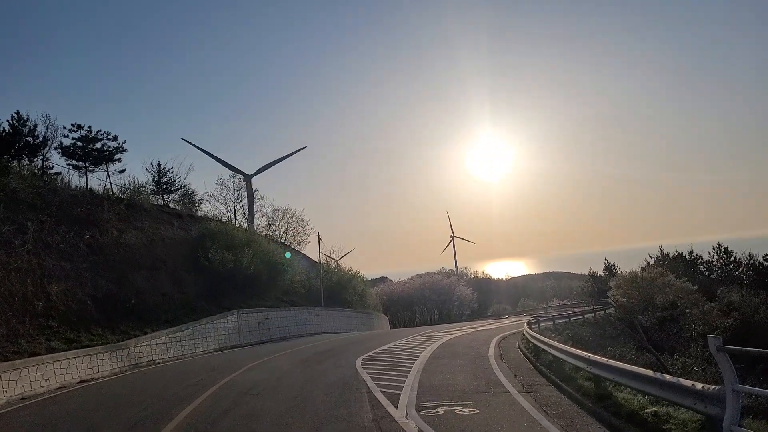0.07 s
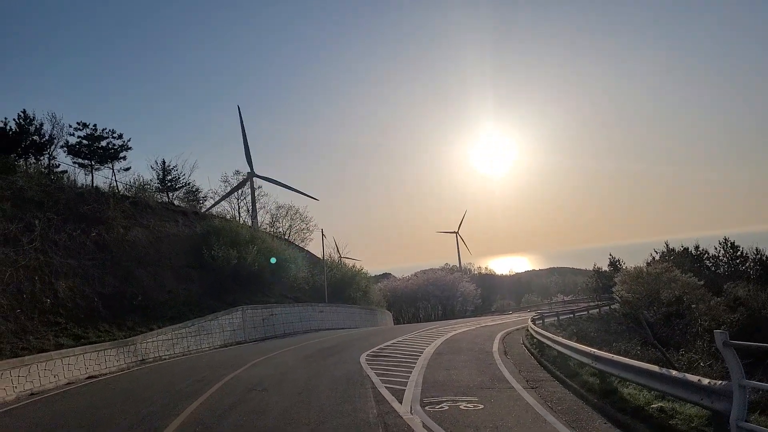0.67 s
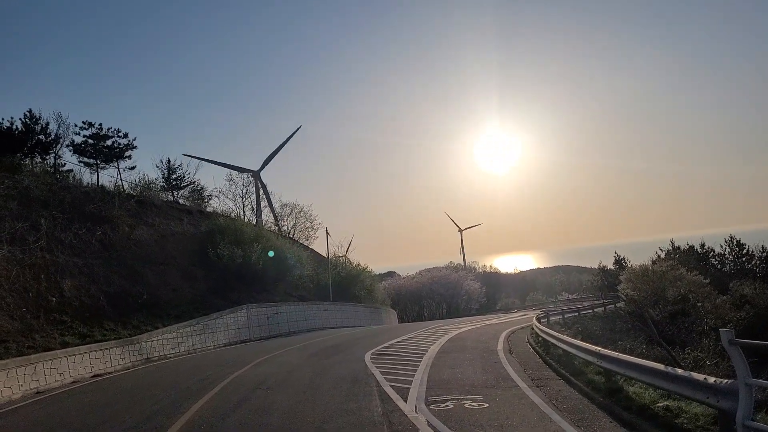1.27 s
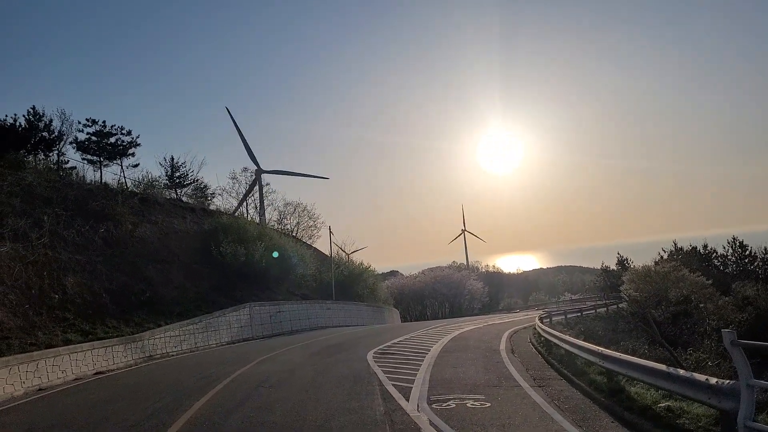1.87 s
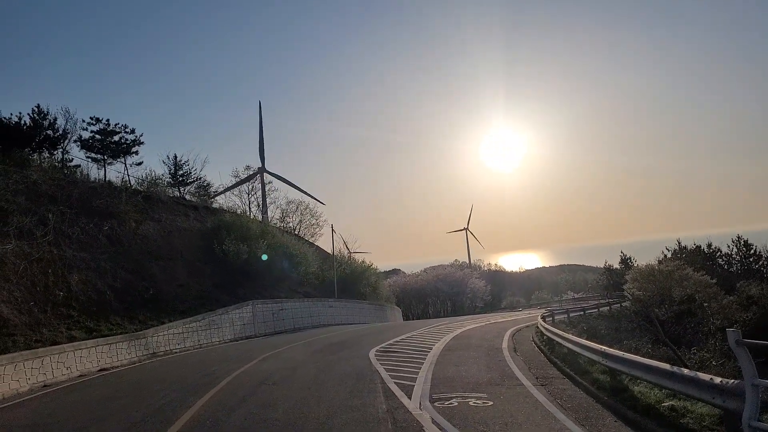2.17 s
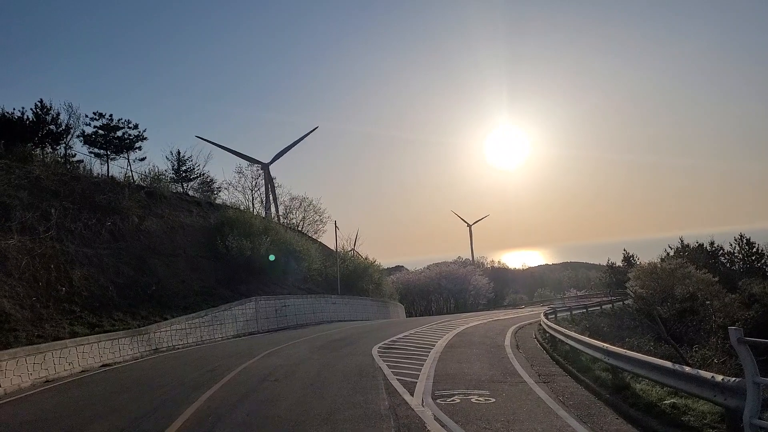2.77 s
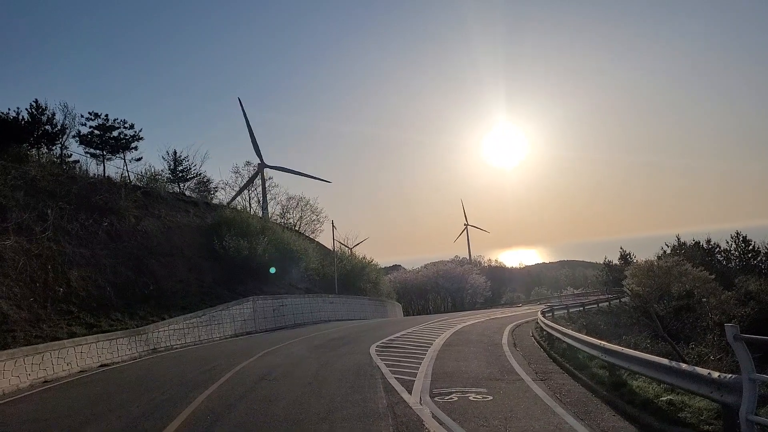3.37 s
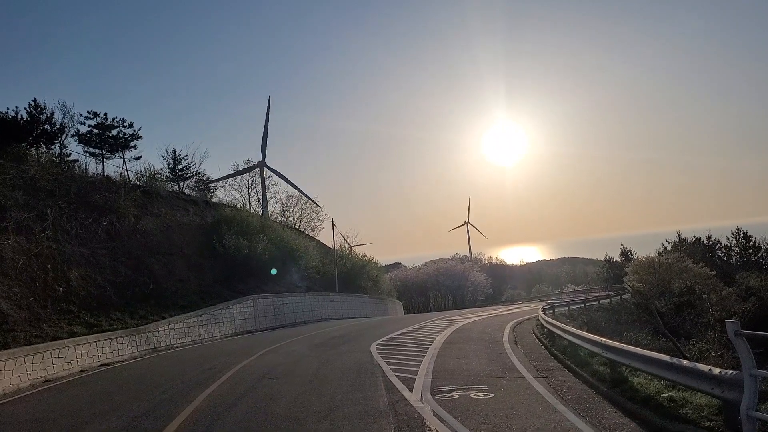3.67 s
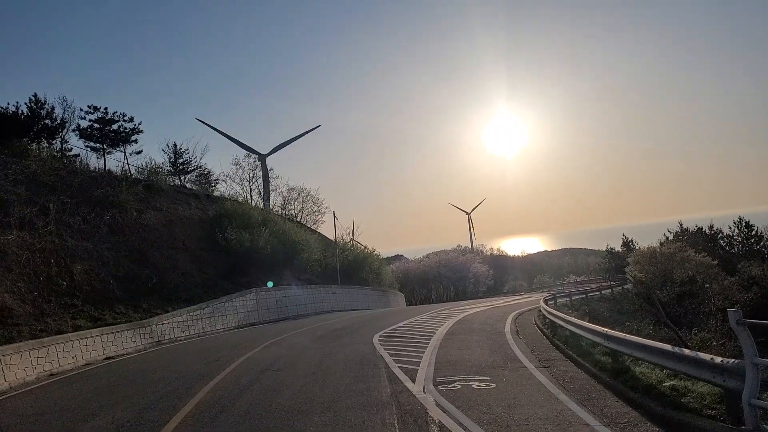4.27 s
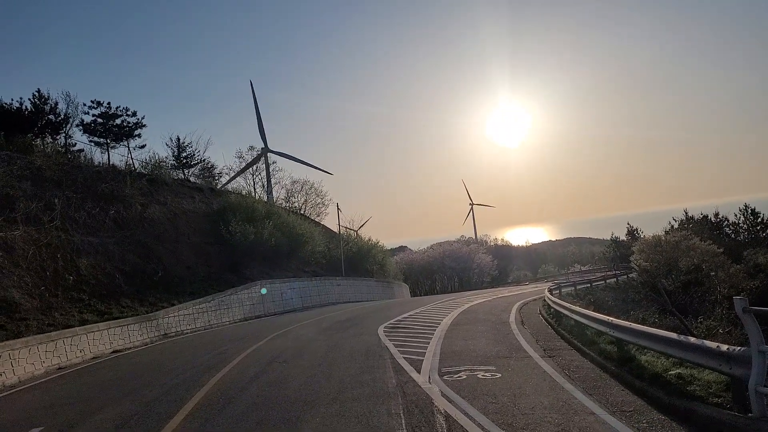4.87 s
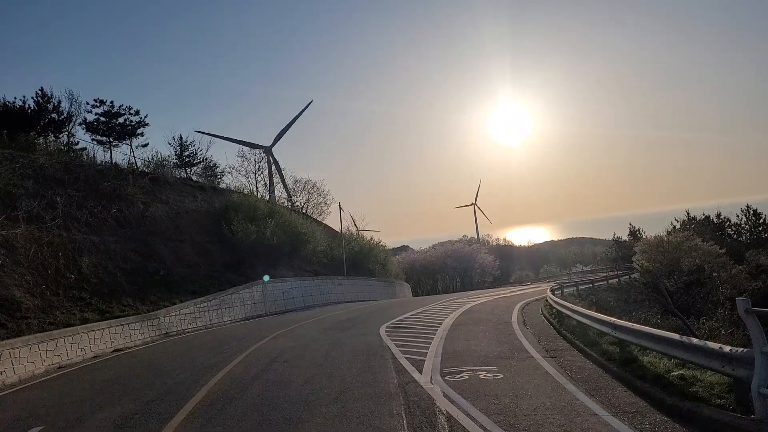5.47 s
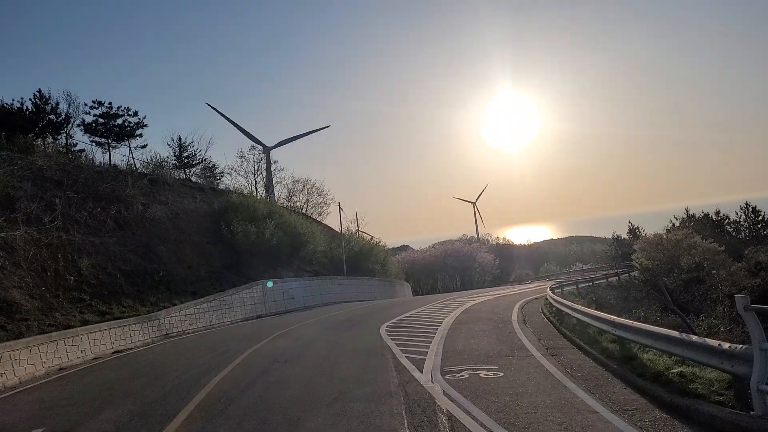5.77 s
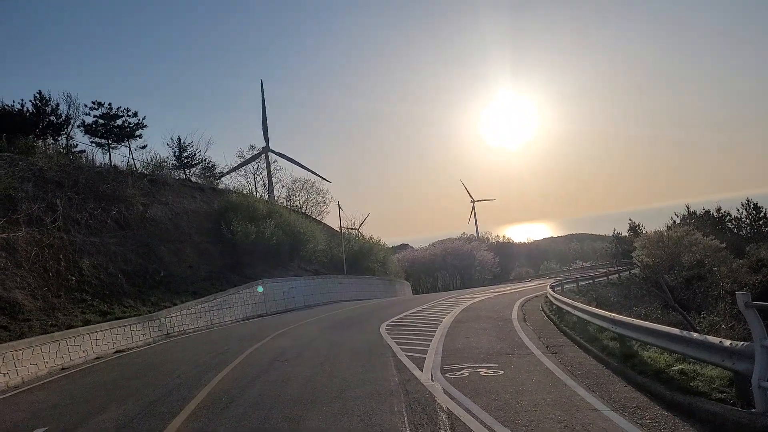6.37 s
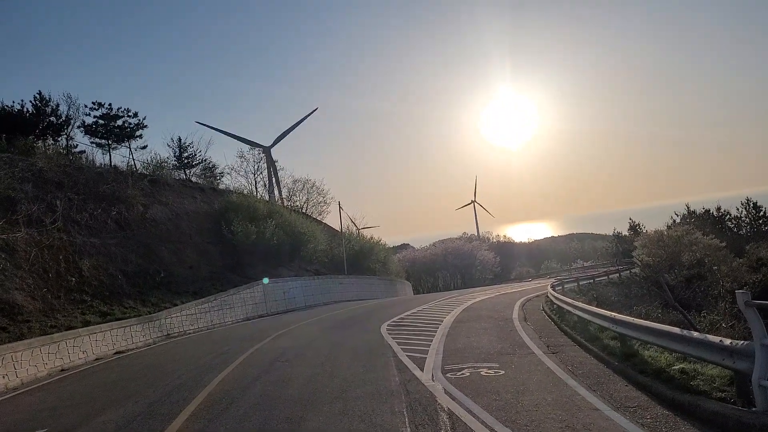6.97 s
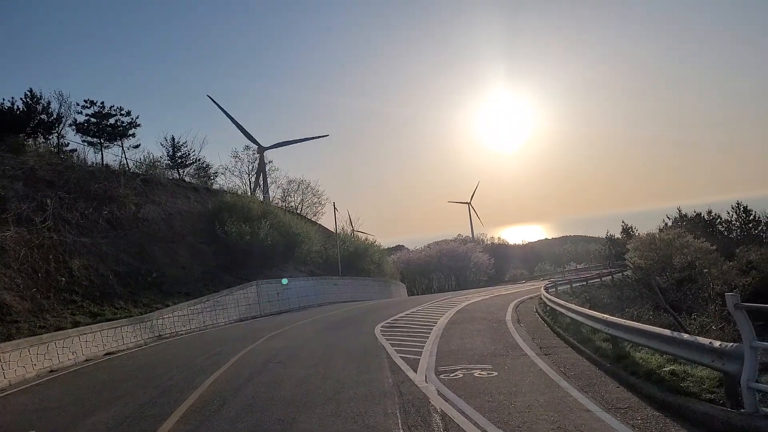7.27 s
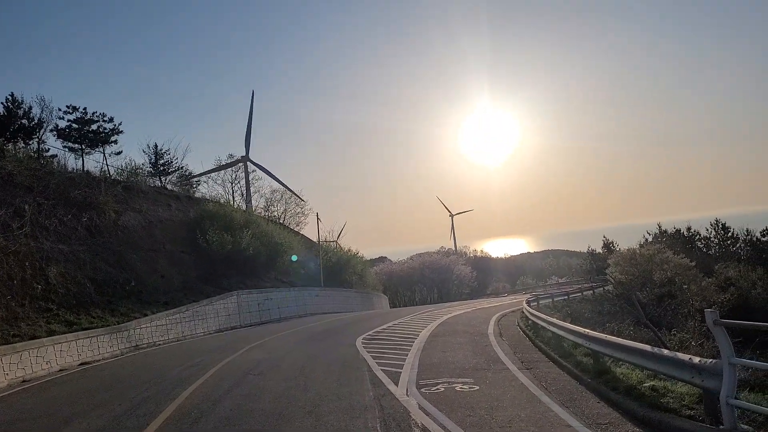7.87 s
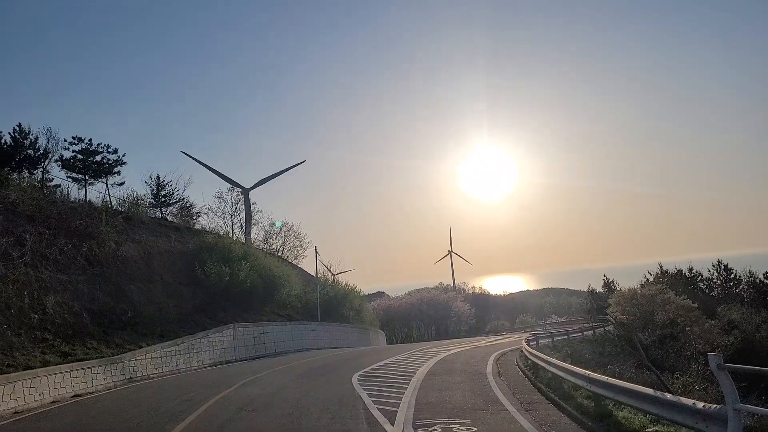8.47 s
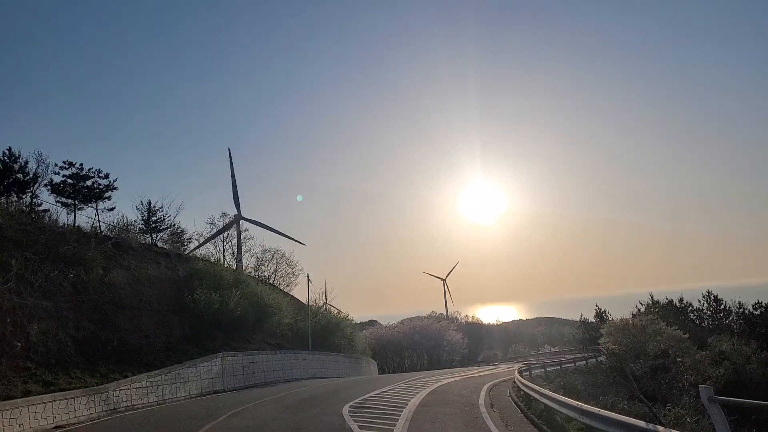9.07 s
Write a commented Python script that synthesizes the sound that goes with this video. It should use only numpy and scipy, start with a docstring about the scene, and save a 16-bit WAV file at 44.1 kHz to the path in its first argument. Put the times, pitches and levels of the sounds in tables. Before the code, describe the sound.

On an open roadside by the coast, low wind rumble flutters on the microphone over the roar and slow swish of wind turbines. Faint bird notes sound in the first couple of seconds, followed by one short, light rub against the microphone. The blade tips whistle softly now and then. About seven seconds in, a strong gust thumps the right channel for over a second before the breeze settles.

```python
"""Wind turbines roar and swish over a low wind rumble, on a coastal roadside in a light breeze.
The roar swells with the breeze and each falling blade; one rough blade hisses once a turn,
and tip vortices whistle now and then. Eddies rumble on both microphone ports of a hand-held
camera, and one gust hits the right port hard. Fainter: a far bird's warble, one brush against
the camera, a thin sizzle on the right and microphone hiss."""
import sys
import numpy as np
from scipy import signal
from scipy.fft import rfft, irfft
from scipy.io import wavfile
from scipy.ndimage import uniform_filter1d

SR = 44100
rng = np.random.default_rng(int(sys.argv[2]) if len(sys.argv) > 2 else 0)


def digitize_waveform(pressure):
    """Quantize a signal to 16-bit integers and store it at the path in sys.argv[1].

    Rows of a 2-D input are taken as channels; values are limited to [-1, 1].
    """
    field = np.atleast_2d(pressure).T
    bounded = np.clip(field, -1, 1)
    quanta = np.round(bounded * 32767).astype(np.int16)
    wavfile.write(sys.argv[1], SR, quanta)


N = 406602
TIME_S = np.arange(N) / SR
TURN_S, BLADE_COUNT = 4.18, 3

# breeze strength, driving roar and eddies: t/s, relative level/dB
BREEZE = [(0.0, 0.4), (0.21, 0.1), (0.59, -1.3), (0.82, -0.5), (1.62, 0.5), (1.79, 2.5), (2.61, 0.6),
          (2.98, 1.05), (3.5, 2.5), (3.87, -1.5), (4.28, -1.06), (5.28, -1.4), (6.33, 0.26), (6.86, -1.5),
          (6.91, 3.3), (7.76, 5), (8.51, -3.5), (9.22, -1.5)]


def gain_of(db):
    """dB to amplitude factor."""
    return 10 ** (np.asarray(db) / 20)


def unit_rms(x):
    """Scale to rms 1."""
    return x / np.sqrt(np.mean(x ** 2) + 1e-20)


def over_hz(rows, hz, column=1):
    """Interpolate a table column over log frequency."""
    table = np.transpose(rows)
    return np.interp(np.log(hz + 1), np.log(table[0] + 1), table[column])


def over_time(rows, t, column=1):
    """Interpolate a table column over time."""
    table = np.transpose(rows)
    return np.interp(t, table[0], table[column])


def noise(spectrum):
    """Steady coloured noise, rms 1."""
    shape = gain_of(over_hz(spectrum, np.fft.rfftfreq(N, 1 / SR)))
    return unit_rms(irfft(rfft(rng.standard_normal(N)) * shape, N))


def wander(t, rate_hz):
    """Smooth random drift around rate_hz, rms 1."""
    size, control_hz = 4096, 400
    ratio = np.fft.rfftfreq(size, 1 / control_hz) / rate_hz
    path = unit_rms(irfft(rfft(rng.standard_normal(size)) * ratio / (1 + ratio ** 4)))
    return np.interp(t, np.arange(size) / control_hz, path)


def stft_grid(size=1024):
    """Frame times/s (a column) and bin frequencies/Hz."""
    hop = size // 4
    return np.arange(N // hop + 5)[:, None] * hop / SR, np.fft.rfftfreq(size, 1 / SR)


def noise_frames(t, hz):
    """Short-time spectra of white noise."""
    return rng.standard_normal((len(t), len(hz))) + 1j * rng.standard_normal((len(t), len(hz)))


def to_sound(frames, size=1024):
    """Short-time spectra (frames x bins) to samples."""
    return signal.istft(np.swapaxes(frames, -1, -2), nperseg=size, noverlap=size * 3 // 4)[1][..., :N]


def patches(t, hz, frames, bins):
    """Random lumps in time and frequency, rms 1."""
    white = rng.standard_normal((len(t), len(hz)))
    return unit_rms(uniform_filter1d(uniform_filter1d(white, frames, 0), bins, 1))


def smooth(x, samples):
    """Two-pass moving average."""
    return uniform_filter1d(uniform_filter1d(x, samples), samples)


def steadied(x, samples):
    """Divide out slow level drift."""
    return x / np.sqrt(smooth(x ** 2, samples) + 1e-12)


def rotor_roar(level_db=-50, swish_peak_s=0.44, swell_half_s=0.043):
    """Far rotors and wind over the hill, swelling with the breeze and as each blade comes down."""
    # roar spectrum: f/Hz, density/dB
    spectrum = [(30, -40.5), (100, -20), (200, -17), (270, -2), (350, -0.5), (550, -7.5), (720, -9.5),
                (1000, -14.5), (1400, -16.5), (2100, -22), (2700, -27.5), (3300, -40), (4200, -49),
                (6500, -63.5)]
    # strongest swells of the roar's body: peak t/s, boost/dB
    swells = [(.21, 4), (.37, 5), (1.16, 3), (2.25, 3), (3.51, 2.5), (4.29, 2.5), (4.47, 2.5), (4.8, 2.5),
              (5.48, 4.5)]
    # relation between the ports: f/Hz, coherence/0-1, left phase lead/rad
    ports = [(100, 0.2, 0), (346, 0.88, -0.09), (540, .75, 1.39), (630, 0.8, 0.78), (1010, 0.47, 3.5),
             (1200, 0.73, 3.5), (1660, 0.7, 4), (1860, 0.9, 5), (2600, 0.1, 7.5), (4000, 0.9, 11.5)]
    t, hz = stft_grid()
    breeze_db = over_time(BREEZE, t)
    swish = np.cos(2 * np.pi * BLADE_COUNT * (t - swish_peak_s) / TURN_S)
    body_db = 1.29 * breeze_db + 0.97 * swish + 0.6 * wander(t, rate_hz=8)
    body_db += sum(db * np.exp(-((t - peak_s) / swell_half_s) ** 2) for peak_s, db in swells)
    top_db = breeze_db + 1.3 * swish
    top_share = over_hz([(500, 0.062), (1000, 0.8)], hz)
    field_db = over_hz(spectrum, hz) + (1 - top_share) * body_db + top_share * top_db
    # turbulence on the way: single bands come and go, the whole body flutters
    field_db += 2 * patches(t, hz, frames=14, bins=3)
    field_db += 1.5 * (1 - top_share / 2) * patches(t, hz, frames=7, bins=60)
    coherence = np.clip(over_hz(ports, hz), 0, 1)
    left = noise_frames(t, hz)
    right = coherence * left + np.sqrt(1 - coherence ** 2) * noise_frames(t, hz)
    right *= np.exp(-1j * over_hz(ports, hz, column=2))  # sound reaches the left port first
    lean_left = gain_of(over_hz([(240, 4.5), (360, -0.73)], hz))
    stereo = np.array([left * lean_left, right / lean_left])
    return gain_of(level_db) * unit_rms(to_sound(stereo * gain_of(field_db)))


def blade_hiss(offset_db=1, fade_db_per_s=0.53):
    """Air tears off the trailing edges; the swishes repeat every turn, slowly weakening."""
    # trailing-edge spectrum: f/Hz, density/dB
    spectrum = [(1200, -13), (2500, -4.5), (3100, -2), (3450, -1.5), (3850, 3.5), (4500, -4), (5200, -6.5),
                (6000, -10), (6800, -9.5), (7200, -21), (8000, -22.5), (8600, -36)]
    # right port, facing away from the rotor: f/Hz, level re left/dB
    shadow = [(3000, 3.5), (3800, -3), (4400, -4.5), (5000, -10), (8000, -14.5)]
    # swishes of one turn, the rough blade first and swelling twice:
    # peak t/s, rise/(dB/s), fall/(dB/s), relative level/dB
    swishes = [(.27, 62, 10, -66.5), (.95, 23, 16, -73.5), (1.95, 17, 25.5, -77), (3.45, 14, 23.5, -75)]
    t, hz = stft_grid()
    field_db = over_hz(spectrum, hz) + 2.5 * patches(t, hz, frames=20, bins=5)
    left = noise_frames(t, hz)
    right = noise_frames(t, hz) * gain_of(over_hz(shadow, hz))
    hiss = to_sound(np.array([left, right]) * gain_of(field_db))
    power = np.zeros(N)
    for peak_s, rise_db_per_s, fall_db_per_s, db in swishes:
        since_s = (TIME_S - peak_s) % TURN_S
        below_peak_db = np.minimum(fall_db_per_s * since_s, rise_db_per_s * (TURN_S - since_s))
        power += gain_of(db - below_peak_db) ** 2
    return hiss / hiss[0].std() * np.sqrt(power) * gain_of(offset_db - fade_db_per_s * TIME_S)


def airflow_db(port, base_db, breeze_scale, jitter_db, jitter_hz):
    """Airflow level at one port (0 left, 1 right): breeze, random fits and puffs."""
    # lee at the right port: t/s, level offset/dB
    shelter = [(0, -27), (1.2, -18.5), (2.3, -6), (3.1, -8), (4.1, -28), (5.7, -23.5), (9.2, -24.5)]
    # strongest puffs of air: peak t/s, length/s, left level/dB, right level/dB
    puffs = [(0.032, 0.12, -47, -68), (.25, 0.42, -49, -70.5), (0.377, .1, -48.5, -54.5),
             (1.378, 0.085, -45.5, -48.5), (1.676, 0.071, -42, -63), (1.802, 0.11, -44, -56),
             (1.865, 0.13, -48, -41), (2.01, .1, -47, -50), (2.37, .12, -46, -54), (2.711, .1, -56, -47.5),
             (3.008, .26, -40.5, -48), (3.252, .1, -41.5, -57), (3.392, 0.065, -41, -59.5),
             (3.495, 0.11, -47, -46), (3.693, 0.16, -42, -64.5), (3.846, 0.1, -46, -70.5),
             (5.575, .12, -45, -58), (6.04, 0.17, -39, -65.5), (6.254, .22, -43.5, -72),
             (6.692, .16, -43.5, -66.5), (7.03, 0.13, -41, -69.5), (7.4, 0.16, -41, -73)]
    flow_db = base_db + breeze_scale * over_time(BREEZE, TIME_S) + port * over_time(shelter, TIME_S)
    power = gain_of(flow_db + jitter_db * wander(TIME_S, jitter_hz)) ** 2
    for peak_s, length_s, *port_db in puffs:
        near = abs(TIME_S - peak_s) < length_s / 2
        window = np.cos(np.pi * (TIME_S[near] - peak_s) / length_s) ** 2
        power[near] += (gain_of(port_db[port]) * window) ** 2
    return 10 * np.log10(power)


def eddies(flow_db, spectrum, gain_db, lumps_db, deepening):
    """Lumpy rumble of turbulence on one port; strong eddies are larger, so deeper."""
    t, hz = stft_grid(size=2048)
    strength_db = np.interp(t, TIME_S, flow_db)
    bass_share = over_hz([(35, 1), (160, 0)], hz)
    field_db = over_hz(spectrum, hz) + lumps_db * patches(t, hz, frames=3, bins=14)
    field_db += deepening * (strength_db - strength_db.mean()) * bass_share
    rumble = to_sound(noise_frames(t, hz) * gain_of(field_db), size=2048)
    return steadied(rumble, samples=4000) * gain_of(gain_db + flow_db)


def port_wind():
    """Left and right rumble: each port has its own airflow and eddies."""
    # eddies on the open left port: f/Hz, density/dB
    left_spectrum = [(15, -20.5), (30, -9.5), (48, 4), (68, -1), (100, -10), (150, -4.5), (200, -15),
                     (270, -8.5), (400, -15.5), (700, -25), (2000, -54.5), (5000, -80)]
    # eddies on the sheltered right port: f/Hz, density/dB
    right_spectrum = [(15, -16.5), (30, -12), (55, -7), (150, 2.5), (250, -1), (400, -4), (700, -16),
                      (2000, -56), (5000, -81)]
    left_db = airflow_db(port=0, base_db=-50.5, breeze_scale=1.3, jitter_db=1.55, jitter_hz=7)
    right_db = airflow_db(port=1, base_db=-51.5, breeze_scale=1.4, jitter_db=3.5, jitter_hz=5.3)
    left = eddies(left_db, left_spectrum, gain_db=2.5, lumps_db=2.5, deepening=0.45)
    right = eddies(right_db, right_spectrum, gain_db=1.5, lumps_db=5.5, deepening=0.2)
    return left, right


def gust(start_s=6.9, end_s=8.263, offset_db=-0.6, buffet_db=1.9, buffet_hz=14):
    """Air buffets a port head-on; faster air sheds smaller eddies, so the rumble's top climbs."""
    # course of the gust: t/s, relative level/dB, relative air speed
    course = [(6.9, -19.5, 1.33), (7.04, -17, 0.78), (7.22, -21.5, 0.93), (7.41, -26, 1.08),
              (7.57, -18.5, 1.06), (7.66, -18, 0.75), (7.71, -30.5, 1.08), (7.81, -15.5, 0.98),
              (7.95, -24.5, 1.11), (8.2, -13.5, 1.2), (8.26, -17.5, 1.38)]
    # rumble at relative speed 1: f/Hz, density/dB
    spectrum = [(15, -25), (32, -9.5), (45, -1), (62, -3), (82, -4.5), (120, -1), (150, -4.5), (185, -7),
                (240, -7), (320, -18), (420, -28), (560, -39), (900, -53.5), (3000, -101)]
    t, hz = stft_grid(size=2048)
    speed = over_time(course, t, column=2) * np.exp(0.067 * wander(t, buffet_hz))
    stretch = speed ** over_hz([(110, 0.25), (300, 0.94)], hz)
    field_db = over_hz(spectrum, hz / stretch) + 2.5 * patches(t, hz, frames=2, bins=12)
    rumble = to_sound(noise_frames(t, hz) * gain_of(field_db), size=2048)
    push_db = offset_db + over_time(course, TIME_S) + buffet_db * wander(TIME_S, buffet_hz)
    push = gain_of(push_db) * (TIME_S > start_s) * (TIME_S < end_s)
    return steadied(rumble, samples=1600) * smooth(push, samples=150)  # air starts and stops in a few ms


def tip_whistles(left_db=1, right_db=-2):
    """Tip vortices sing in a narrow noise band that glides as the blade sweeps past."""
    # breathy whistles: t/s, length/s, start f/Hz, end f/Hz, bandwidth/Hz, relative level/dB
    whistles = [(1.718, 0.28, 2970, 2950, 450, -68), (2.039, 0.25, 2317, 1980, 200, -63),
                (2.181, 0.24, 2930, 2800, 500, -68.5), (2.656, 0.24, 3100, 2920, 400, -73.5),
                (3.663, 0.15, 3200, 3060, 260, -75.5), (3.795, 0.18, 3120, 3200, 260, -78),
                (4.02, 0.11, 3150, 3050, 250, -79), (5.75, 0.48, 2720, 2910, 500, -70),
                (6.249, 0.22, 2800, 2430, 480, -63.5), (6.631, .32, 2400, 2660, 220, -70.5),
                (7.36, 0.28, 2850, 2500, 200, -64), (7.68, 0.16, 3000, 2900, 400, -74.5),
                (8.075, 0.055, 2940, 2720, 120, -72), (8.13, 0.052, 2980, 2630, 120, -68.5)]
    out = np.zeros((2, N))
    for start_s, length_s, start_hz, end_hz, width_hz, db in whistles:
        span = round(start_s * SR) + np.arange(round(length_s * SR))
        white = rng.standard_normal((2, SR)) + 1j * rng.standard_normal((2, SR))
        flutter = signal.lfilter(*signal.butter(2, width_hz / 2, fs=SR), white)[:, -len(span):]
        pitch_hz = np.linspace(start_hz, end_hz, len(span))
        carrier = np.exp(2j * np.pi * np.cumsum(pitch_hz) / SR)
        band = unit_rms((flutter * carrier).real)
        out[:, span] += gain_of(db) * band * signal.windows.tukey(len(span), 0.8)
    return out * gain_of([[left_db], [right_db]])


def bird(waver=0.025, t60_s=0.4):
    """Short gliding whistles, scattered by trees and slope."""
    # bird notes: t/s, length/s, start f/Hz, end f/Hz, direct level/dB
    notes = [(.33, .09, 2150, 2280, -69), (.55, .06, 2350, 2100, -71), (.63, .08, 2480, 2620, -70),
             (.705, .06, 2630, 2250, -67), (.77, .05, 2400, 2050, -69), (1.015, .055, 2600, 2130, -64.5),
             (1.08, .07, 2130, 2600, -66), (1.21, .055, 2500, 2030, -65.5),
             (1.275, .085, 2130, 2620, -63.5), (1.455, .05, 2580, 2170, -65.5),
             (1.53, .06, 2120, 2420, -66), (2.305, .045, 2850, 2200, -68)]
    song = np.zeros(N)
    wobble = 1 + waver * unit_rms(uniform_filter1d(rng.standard_normal(N), size=120))
    for start_s, length_s, start_hz, end_hz, db in notes:
        span = round(start_s * SR) + np.arange(round(length_s * SR))
        pitch_hz = np.linspace(start_hz, end_hz, len(span)) * wobble[span]
        tone = np.sin(2 * np.pi * np.cumsum(pitch_hz) / SR)
        song[span] += gain_of(db) * tone * signal.windows.tukey(len(span), 0.5)
    tail_s = np.arange(SR // 2) / SR
    tail = rng.standard_normal((2, len(tail_s))) * gain_of(-60 * tail_s / t60_s)
    echo = signal.fftconvolve(song[None], tail / np.linalg.norm(tail[0]), axes=1)[:, :N]
    return song + echo


def camera_brush(level_db=-57, grain_db=2, left_db=-30):
    """Grainy rub beside the right port: louder and brighter with pressure, ticking where it catches."""
    # friction spectrum: f/Hz, density/dB
    spectrum = [(300, -6), (2000, -6), (3800, -0.5), (5000, -5), (6700, 3.5), (9500, -4), (11300, 1.5),
                (13500, -5), (16000, -5)]
    # catches of the rub: t/s, level/dB
    catches = [(2.5985, -50), (2.672, -49), (2.725, -52)]
    touch_s, firmest_s, lift_s = 2.602, 2.673, 2.727
    press_db_per_s, ease_db_per_s = 130, 60
    tick_s, release_s = 0.0015, 0.004
    t = TIME_S
    grain = unit_rms(uniform_filter1d(rng.standard_normal(N), size=60))
    slack_db = np.maximum(press_db_per_s * (firmest_s - t), ease_db_per_s * (t - firmest_s))
    contact = (t > touch_s) * np.exp(-np.maximum(t - lift_s, 0) / release_s)
    rub = gain_of(level_db - slack_db + grain_db * grain) * contact
    ticks = sum(gain_of(db) * np.exp(-abs(t - at_s) / tick_s) * (t > at_s) for at_s, db in catches)
    friction = noise(spectrum)
    dull = signal.sosfiltfilt(signal.butter(3, 10000, fs=SR, output="sos"), friction)
    treble = (friction - dull) * gain_of(-1.5 * slack_db)
    return (dull + treble) * (rub + ticks) * gain_of([[left_db], [0]])


def sizzle():
    """Faint thin noise near 8 kHz, about a second long."""
    # sizzle envelope: t/s, level/dB
    envelope = [(1.4, -115), (1.7, -84.5), (2.5, -86), (2.7, -115)]
    # sizzle spectrum: f/Hz, density/dB
    spectrum = [(6000, -31.5), (7800, -17), (8150, 4.5), (8900, -8.5), (10000, -22.5), (13000, -34.5)]
    return noise(spectrum) * gain_of(over_time(envelope, TIME_S))


def mic_hiss(level_db=-83):
    """Each microphone's own noise."""
    # self-noise spectrum: f/Hz, density/dB
    spectrum = [(100, -3), (4000, -1.5), (6700, 1), (8500, 1.5), (11000, 1), (16000, 2)]
    return gain_of(level_db) * np.array([noise(spectrum), noise(spectrum)])


def scene():
    """Far sounds reach both ports; gust and sizzle only the right."""
    left, right = port_wind()
    near = np.array([left, right + gust() + sizzle()])
    return rotor_roar() + blade_hiss() + near + tip_whistles() + bird() + camera_brush() + mic_hiss()


def record(dry):
    """The camera's low cut and band limit."""
    low_cut_hz, band_edge_hz = 43, 15850
    thinned = signal.sosfilt(signal.butter(4, low_cut_hz, "high", fs=SR, output="sos"), dry)
    lowpass = signal.firwin(1023, band_edge_hz, window=("kaiser", 9), fs=SR)
    return signal.oaconvolve(thinned, lowpass[None], "same")


dry = scene()
out = record(dry)
digitize_waveform(out)
```